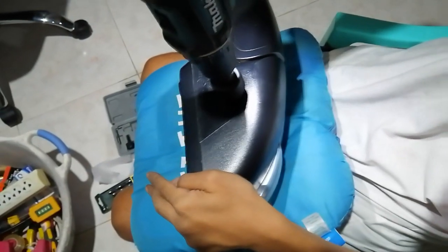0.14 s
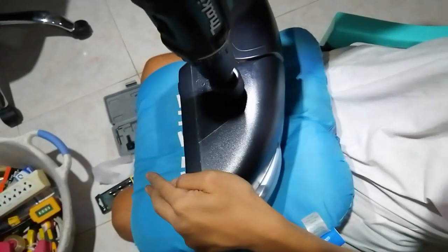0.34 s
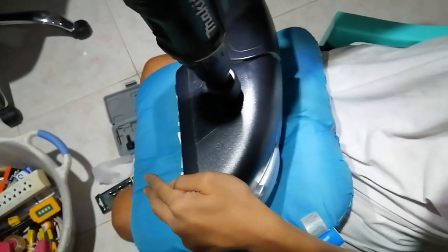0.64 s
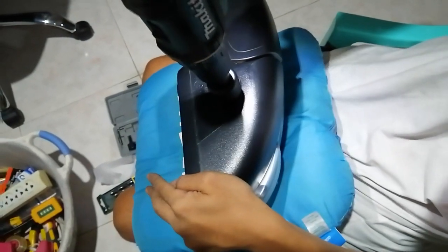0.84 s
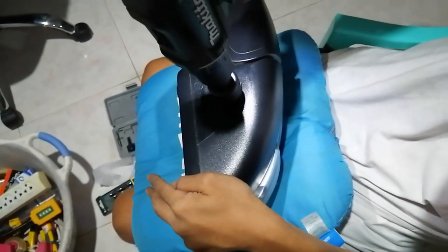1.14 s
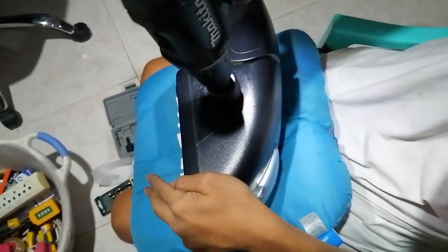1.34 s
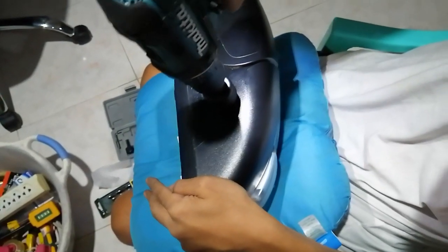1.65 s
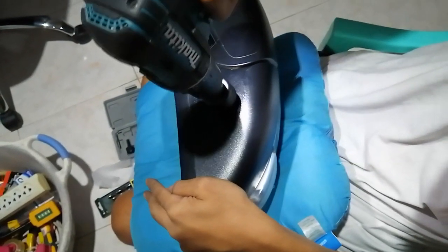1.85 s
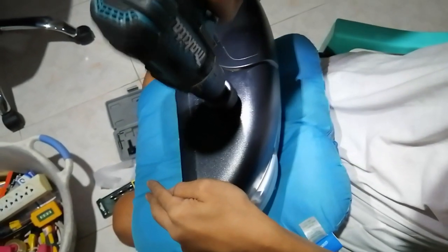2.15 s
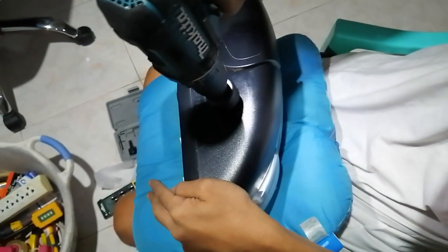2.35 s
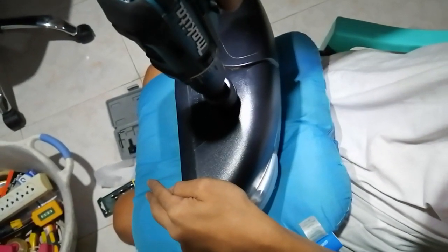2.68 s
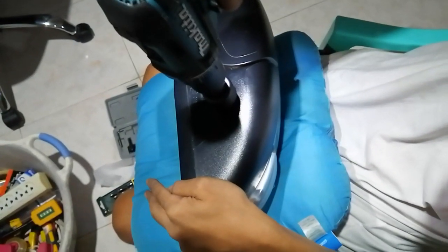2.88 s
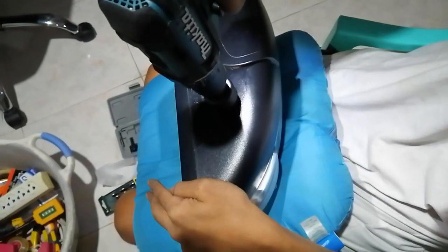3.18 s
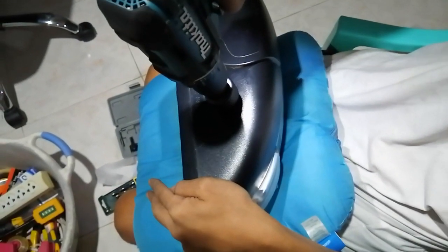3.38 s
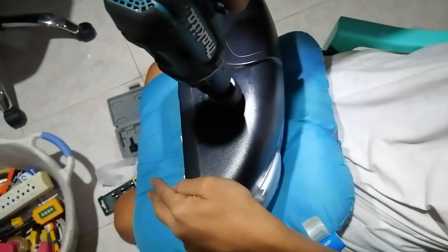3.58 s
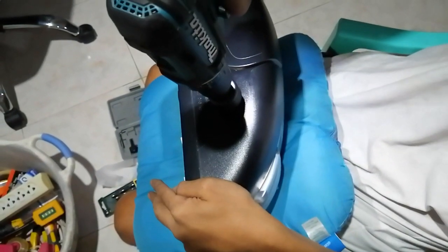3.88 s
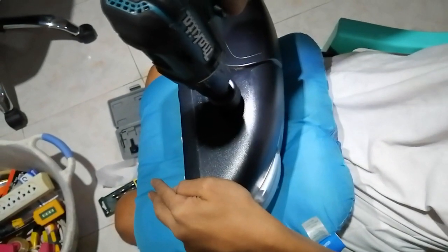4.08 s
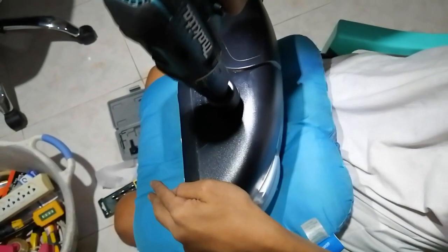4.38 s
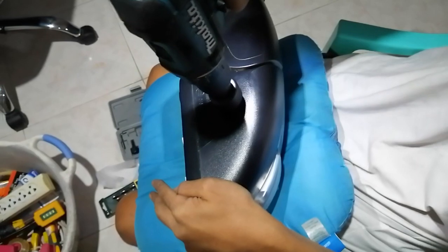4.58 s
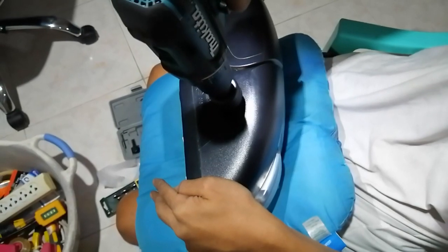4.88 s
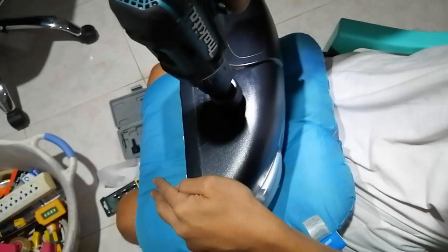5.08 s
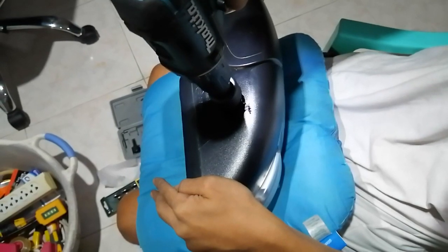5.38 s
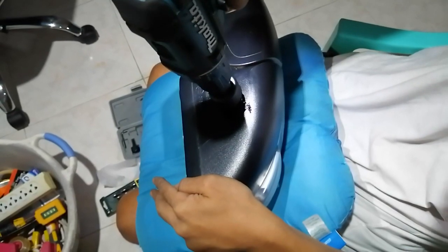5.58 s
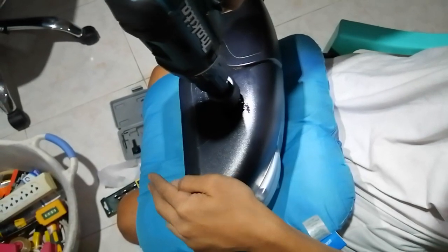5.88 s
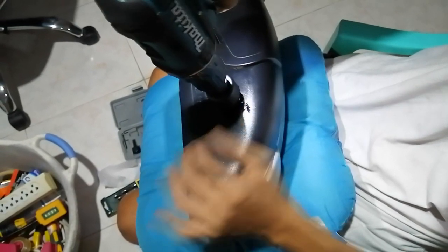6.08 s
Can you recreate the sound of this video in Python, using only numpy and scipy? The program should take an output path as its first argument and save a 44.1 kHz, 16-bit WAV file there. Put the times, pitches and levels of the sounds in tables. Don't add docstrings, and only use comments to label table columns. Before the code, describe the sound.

Close stereo phone pickup of a drill and hole saw on a hollow plastic shell. Buzzing low-speed motor jumps quickly to full speed, a dense gear whine with rough roar and airy hiss, dipping under load for several seconds. It slows briefly and cuts off; the shell and tiles ring. Then very quiet rustling, low microphone rumble, faint hum, insect hiss, small finger taps, a scrape and a skin squeak.

```python
import sys
import numpy as np
from scipy import signal
from scipy.fft import rfft, irfft, next_fast_len
from scipy.io import wavfile
from scipy.ndimage import map_coordinates

SR = 44100
rng = np.random.default_rng(int(sys.argv[2]) if len(sys.argv) > 2 else 0)


def attenuation_scalar(level_db):
    decades = np.asarray(level_db, float) / 20
    return 10 ** decades


def wrap_up_sound(samples):
    columns = np.atleast_2d(samples).T
    tamed = np.clip(columns, -1, 1)
    steps = np.round(tamed * 32767).astype(np.int16)
    wavfile.write(sys.argv[1], SR, steps)


N = 274886
TIME = np.arange(N) / SR


def unit(x):
    return x / np.sqrt(np.mean(x ** 2) + 1e-20)


def along(points, hz):
    f, v = np.transpose(points)
    return np.interp(np.log(hz + 1), np.log(f + 1), v)


def curves(rows):
    s, *cols = np.transpose(rows)
    return [np.interp(TIME, s, c) for c in cols]


def wobble(rate):
    knots = rng.standard_normal(int(N * rate / SR) + 4)
    return map_coordinates(knots, [TIME * rate], order=1)


def filtered(x, response):
    m = next_fast_len(N + 8192)
    return irfft(rfft(x, m) * response(np.fft.rfftfreq(m, 1 / SR)), m)[..., :N]


# frequency in Hz, likeness from 0 to 1.
ALIKE = [(60, 0.3), (130, .88), (290, 0.93), (640, 0.33), (1410, 0.52), (3100, 0.18), (6820, 0.23),
         (15000, 0.18)]


def paired(x, spectrum):
    def response(hz):
        turn = np.arccos(np.clip(along(ALIKE, hz), -1, 1)) / 2
        return attenuation_scalar(along(spectrum, hz)) * [np.cos(turn), np.sin(turn)]

    mid, side = filtered(x, response)
    return np.array([mid + side, mid - side])


def rush(spectrum, repeats=0):
    pair = paired(rng.standard_normal((2, N)) + repeats, spectrum)
    return pair / np.std(pair.mean(0))


def tone(turns, db, flutter_db, spread):
    phase = 2 * np.pi * (turns + rng.random() + .028 * wobble(45))
    lead = spread * np.tanh(wobble(4.7))
    level = np.sqrt(2) * attenuation_scalar(db + flutter_db * wobble(35))
    return level * np.sin([phase + lead, phase - lead])


# frequency in Hz, level in dB per Hz.
AIR = [(12, -30.5), (20, -19.5), (97, -11), (164, -16), (199, -8.5), (387, -11.5), (587, -9), (693, -14.5),
       (940, -11.5), (1020, -8.5), (1420, -21), (2280, -15), (4430, -35), (7100, -32), (15000, -55.5)]


def room_air():
    return attenuation_scalar(-63) * rush(AIR)


# frequency in Hz, level in dB per Hz.
INSECT = [(6400, -42), (6900, -4), (7150, 0.5), (7500, -13), (8200, -42.5)]


def insects():
    return attenuation_scalar(-80) * rush(INSECT)


# frequency in Hz, level in dB.
HUM = [(156.1, -76), (586.8, -73.5), (748.3, -76), (899.0, -75.5), (1039, -80), (1157, -75)]


def appliances():
    return sum(tone(hz * TIME, db + 0.29, flutter_db=-0.5, spread=1.0) for hz, db in HUM)


# frequency in Hz, time to fall by 60 dB in seconds.
ROOM = [(150, .4), (250, .5), (380, .75), (700, .5), (1500, 0.43), (4000, 0.36), (12000, 0.28)]


def room(x):
    hz, t, z = signal.stft(rng.standard_normal((2, SR)), SR, nperseg=256)
    fade = attenuation_scalar(-60 * t / along(ROOM, hz)[:, None])
    tail = signal.istft(z * fade, SR, nperseg=256)[1]
    wet = signal.fftconvolve(x.mean(0)[None], tail / np.linalg.norm(tail[0]), axes=1)[:, :N]
    return paired(wet, [(100, 0), (10000, 0)])


# time in seconds, level in dB.
SWAYS = [
    (5.47, -58),
    (5.58, -63.5),
    (5.83, -60),
    (5.99, -59),
    (6.06, -61.5),
    (6.18, -63.5),
]


def phone_sway():
    sway_s = .045
    swing = sum(attenuation_scalar(db) * np.exp(-((TIME - s) / sway_s) ** 2) for s, db in SWAYS) + attenuation_scalar(-75)
    return swing * rush([(12, -15), (45, 6.5), (90, -9), (150, 7), (230, -32), (900, -90)])


# time in seconds, effort from 0 to 1.
REACH = [
    (5.5, 0.1),
    (5.95, 0.1),
    (6.04, 0.8),
    (6.16, 0.97),
    (6.23, 0.7),
]


def cloth_rub():
    effort, = curves(REACH)
    let_go_s, let_go_db, let_go_t60_s = 5.5, -54, .3
    slip = attenuation_scalar(let_go_db - 60 * abs(TIME - let_go_s) / let_go_t60_s)
    rub = (slip + attenuation_scalar(-70 + 11.5 * effort)) * attenuation_scalar(1.7 * wobble(60))
    rub = rub * rush([(500, -23), (1500, -6), (2200, 2), (3200, -3.5), (4500, -18), (9000, -90)])
    fine = attenuation_scalar(-81 + 12.5 * effort + 1.5 * wobble(60))
    fine = fine * rush([(2500, -45), (4300, 0.5), (6500, -8), (9000, -15), (13000, -20), (15000, -45)])
    return rub + fine


# time in seconds, level in dB.
SCUFF = [
    (6.17, -100),
    (6.2, -57),
    (6.215, -55.5),
    (6.24, -56),
]


def scuff():
    return attenuation_scalar(curves(SCUFF)[0]) * rush([(3300, -36.0), (4200, -5), (4800, -2), (5200, -25), (7000, -93.5)])


# time in seconds, pitch in Hz, level in dB.
SQUEAK = [
    (6.11, 6700, -95),
    (6.12, 6550, -63),
    (6.135, 6100, -66),
    (6.16, 5700, -70),
    (6.19, 5500, -76),
    (6.24, 5300, -95),
]


def squeak():
    hz, db = curves(SQUEAK)
    return tone(np.cumsum(hz + 220 * wobble(500)) / SR, db, flutter_db=2, spread=.5)


# time in seconds, peak level in dB, shell pitch in Hz.
KNOCK = [
    (5.27, -46, 372),
    (6.135, -52, 1050),
    (6.153, -49, 340),
]


def knocks():
    out = np.zeros((2, N))
    for s, peak_db, shell_hz in KNOCK:
        t = np.clip(TIME - s, 0, 1)
        thud = rush([(shell_hz / 2, -30), (shell_hz, 0), (shell_hz * 1.7, -12),
                     (shell_hz * 6, -22), (15000, -70)])
        out += attenuation_scalar(peak_db - 60 * t / 0.12) * (1 - np.exp(-t / 0.0022)) * thud
    return out


def hand():
    after = np.clip((TIME - 5.4) / 0.28, 0, 1)
    return after * (cloth_rub() + phone_sway()) + scuff() + squeak() + knocks()


# frequency in Hz, level in dB.
BOUNCE = [(300, -27), (800, -35), (3000, -20.5), (8000, -2)]


def sideways(x, late_s=0.001098):
    def response(hz):
        return attenuation_scalar(along(BOUNCE, hz)) * np.exp(-2j * np.pi * hz * late_s)

    copy = filtered(x.mean(0), response)
    return x + np.array([copy, -copy])


def shell(x):
    mode_hz, width_hz = 376, 16
    return filtered(x, lambda f: 1j * f * width_hz / (mode_hz ** 2 - f * f + 1j * f * width_hz))


FREE_HZ = 353.7
STOP_S = 5.283
# time in seconds, turns a second in Hz.
SPEED = [(1.6, 353.7), (1.72, 349.6), (1.84, 344), (1.96, 331.5), (2.08, 315.9), (2.14, 314.7),
         (2.56, 318.7), (2.69, 324), (2.95, 330.3), (3.1, 337.8), (3.21, 340.4), (3.34, 334.6),
         (3.73, 331.6), (3.86, 333.6), (4.25, 336), (4.64, 336.2), (4.9, 332.4), (5.13, 319)]


def shaft():
    creep_hz, nudge_hz, nudge_s, nudge_takes_s = 118, 11.5, .145, .035
    trigger_s, spin_up_s = .399, .033
    release_s, coast_hz_per_s = 5.145, 450
    creep = creep_hz + nudge_hz * (1 + np.tanh((TIME - nudge_s) / nudge_takes_s)) / 2
    u = np.clip(TIME - trigger_s, 0, 9) / spin_up_s
    coasting_s = np.clip(TIME - release_s, 0, STOP_S - release_s)
    loaded = curves(SPEED)[0] - coast_hz_per_s * coasting_s
    return loaded - (loaded - creep) * (1 + u + u * u / 2) * np.exp(-u)


def rattle(turns, count=60):
    bins = rfft(rng.standard_normal((4, 4096)))
    bins[:, count:] = 0
    bins[:, :6] = 0
    bins[:, [9, 10, 15, 20, 23, 30, 40]] = 0
    one_turn = np.linspace(0, 1, 4097)
    shapes = [np.interp(turns % 1, one_turn, np.append(s, s[0])) for s in unit(irfft(bins))]
    mix = 1.17 * wobble(2.52)
    return np.cos(mix) * np.array(shapes[:2]) + np.sin(mix) * np.array(shapes[2:])


# frequency in Hz, level in dB per Hz.
ROAR = [(59, -69.5), (100, -47.5), (269, -17), (376, -10), (405, -20.5), (471, -21.5), (661, -13.5),
        (744, -14), (999, -8.5), (1120, -7), (1320, -1), (1490, -4), (1880, 0), (3400, -13), (4420, -45.5),
        (7480, -120)]
SLOW_ROAR = [(59, -61), (100, -25), (307, -10), (356, -7), (530, -18), (587, -5), (1010, -15.5),
             (1280, -1.5), (2850, -9.5), (3110, -33), (3400, 0), (4420, -49), (7480, -120)]
HISS = [(1650, -33), (2800, -7), (3190, -28.5), (3500, -7.5), (3650, 0), (4400, -3), (5180, 2.5),
        (6330, -10), (7740, -7.5), (10300, -15), (11500, -15.5), (12600, -23), (14500, -22.5),
        (15500, -23.5)]
SLOW_HISS = [(1650, -51), (2800, -14.5), (3160, -41.5), (3980, 3), (4360, -10), (5150, 0.5), (6200, -13),
             (7630, -10), (8430, -15), (10400, -15.5), (12300, -27), (14600, -24.5), (15500, -34)]


def motor_noise(speed, turns, full):
    surge_db = 1.5 * np.exp(-((TIME - 0.57) / 0.03) ** 2)
    speed_db = 20 * np.log10(speed / FREE_HZ)
    roar_db = -25.5 + 1.45 * speed_db + surge_db
    hiss_db = -24.5 + 0.52 * speed_db + surge_db
    fast, slow = .24 * rattle(turns), .2 * rattle(turns)
    beat = 1 + 0.11 * np.sin(2 * np.pi * turns)
    roar = np.sqrt(full) * rush(ROAR, fast) + np.sqrt(1 - full) * rush(SLOW_ROAR, slow)
    hiss = np.sqrt(full) * rush(HISS, fast) + np.sqrt(1 - full) * rush(SLOW_HISS, slow)
    return attenuation_scalar(roar_db + .3 * wobble(3.7)) * roar + beat * attenuation_scalar(hiss_db + 0.55 * wobble(7.3)) * hiss


# centre in Hz, half width in Hz, level in dB.
CASING = [(640, 120, -8), (820, 160, -9), (1065, 110, -6), (1340, 260, 0), (2800, 330, -10), (3880, 350, 0),
          (5950, 450, -1), (6650, 300, -7), (7200, 520, 0), (8100, 500, -4), (9450, 450, 0),
          (10700, 350, -11), (12500, 800, -10), (14150, 650, 0)]


def casing_db(hz):
    return 20 * np.log10(sum(attenuation_scalar(db) / (1 + ((hz - c) / w) ** 2) ** 2 for c, w, db in CASING))


# tone cycles per shaft turn, level in dB on a resonance.
STRONG = [(2, -37), (3, -37), (4, -38.5), (10, -29), (11.25, -30), (20, -36.5), (23, -34), (30, -45.5),
          (40, -49.5)]
# tone cycles per shaft turn, level in dB.
WEAK = [(12.25, -47), (15, -51), (19, -52), (22.5, -54), (24, -52), (29, -55), (42, -64), (43, -66)]


def gear_tones(speed, turns, full):
    strong, weak = 0, 0
    for k, db in STRONG:
        flutter_db = .9 + 2 * (k == 4)
        strong += tone(k * turns, db + .8 + casing_db(k * speed), flutter_db, spread=.3)
    for k, db in WEAK:
        weak += tone(k * turns, db + .5 + 3.1 * wobble(1.3), flutter_db=-4.5, spread=0.64)
    return np.sqrt(full) * strong + full * weak


# lower side, centre, upper side, in dB.
UNBALANCE_DB = (-45, -42, -42)
# frequency in Hz, level in dB.
SEAT = [(250, -6), (300, -4), (318, 0), (326, -2), (337, -14), (348, -1), (355, -6), (370, -6)]


def unbalance(speed, turns, full):
    chuck = .042
    out = 0
    for k, db in zip((-1, 0, 1), UNBALANCE_DB):
        order = 1 + k * chuck
        out += tone(order * turns, db + along(SEAT, order * speed), flutter_db=.8, spread=.15)
    return np.sqrt(full) * out


# tone cycles per shaft turn, level in dB.
CREEP = [(2, -58), (10, -38.5), (18, -55), (21, -53), (23, -58), (30, -47), (31, -47), (40, -48), (46, -53),
         (57, -53)]
# time in seconds, level in dB.
SETTLE = [
    (0, -8),
    (.12, -7.5),
    (.17, 3),
    (.41, 4.5),
    (.445, 1.5),
    (.48, -28.5),
    (6.3, -60.5),
]


def creep_tones(turns):
    settle_db, = curves(SETTLE)
    return sum(tone(k * turns, db + settle_db, flutter_db=2, spread=.5) for k, db in CREEP)


# multiple of the chopping rate, level in dB.
CHOP = [(2, -61), (3, -47.5), (4, -56), (5, -50), (7, -58), (8, -57), (9, -59)]


def supply_buzz(full):
    chop_hz = 120.1
    return (1 - full) * sum(tone(k * chop_hz * TIME, db, flutter_db=.8, spread=.2) for k, db in CHOP)


# time in seconds, share of full supply from 0 to 1.
FULL = [
    (0, 0),
    (.425, 0),
    (.54, 1),
    (6.3, 1),
]


def drill():
    speed = shaft()
    turns = np.cumsum(speed) / SR
    full, = curves(FULL)
    out = motor_noise(speed, turns, full)
    out += gear_tones(speed, turns, full) + unbalance(speed, turns, full)
    out += creep_tones(turns) + supply_buzz(full)
    return out * attenuation_scalar(-60 * np.clip(TIME - STOP_S, 0, 1) / .11)


def scene():
    near = drill()
    near = near + attenuation_scalar(-3.5) * shell(near)
    background = room_air() + insects() + appliances()
    return background + hand() + attenuation_scalar(-12.0) * room(near) + attenuation_scalar(-0.73) * sideways(near)


def low_pass(x):
    return signal.sosfilt(signal.butter(12, 15140, fs=SR, output="sos"), x)


# frequency in Hz, left minus right in dB.
LEAN = [(60, 1.5), (99, -2), (160, 2), (270, -0.5), (450, 1.5), (740, -2), (1220, 2), (2010, 0.5),
        (3330, -6), (5500, 3), (9080, -4), (15000, 10.5)]


def record(dry):
    top_hz = 15140

    def response(hz):
        lean_db = np.clip(along(LEAN, hz), -4, 4)
        return attenuation_scalar(lean_db * np.array([[.5], [-.5]])) * (hz < top_hz)

    return low_pass(filtered(dry, response))


dry = scene()
out = record(dry)
wrap_up_sound(out)
```